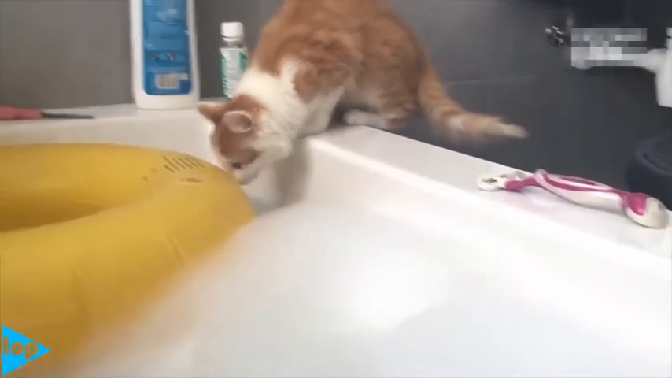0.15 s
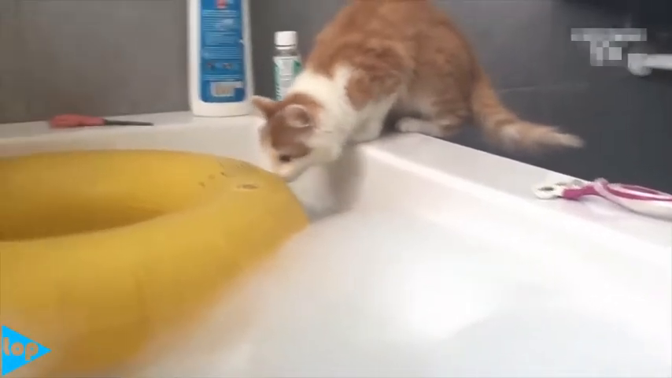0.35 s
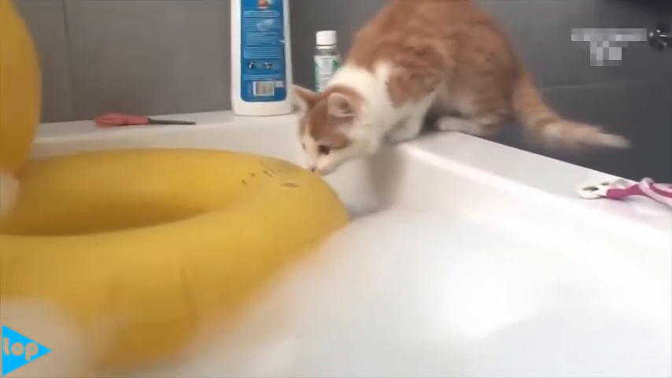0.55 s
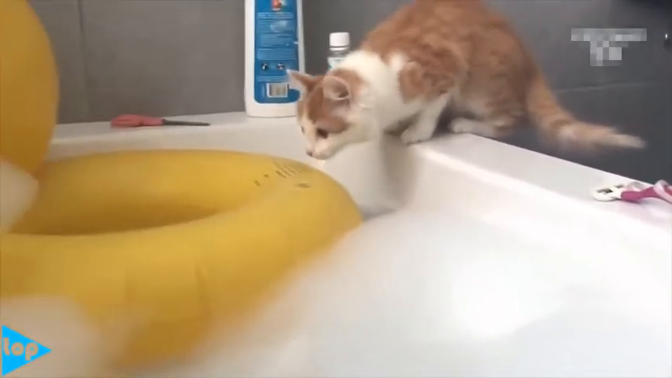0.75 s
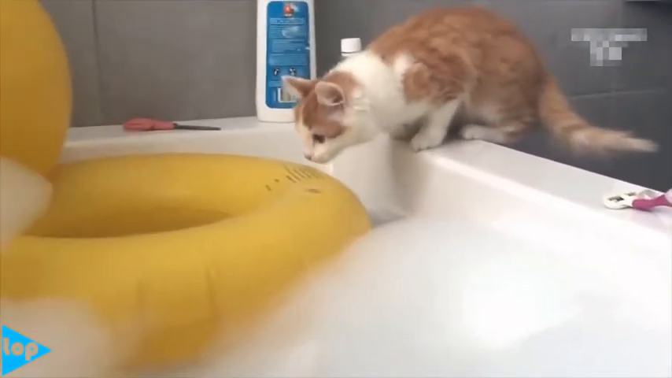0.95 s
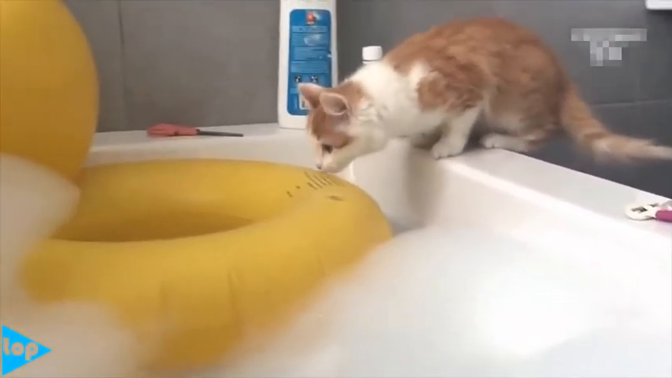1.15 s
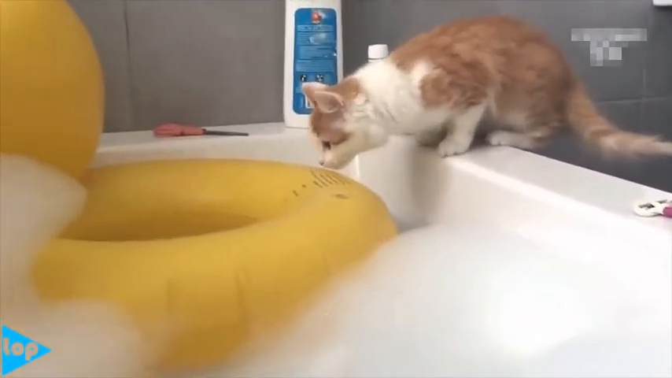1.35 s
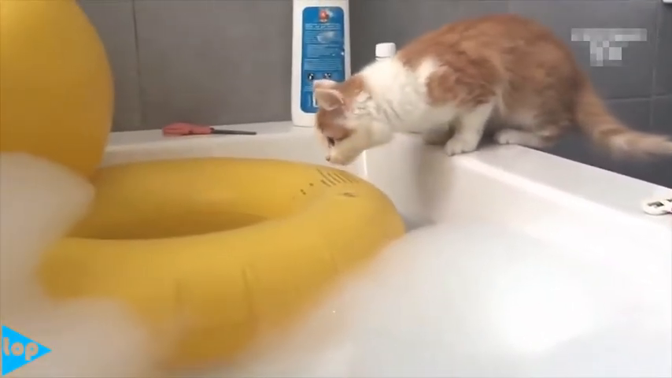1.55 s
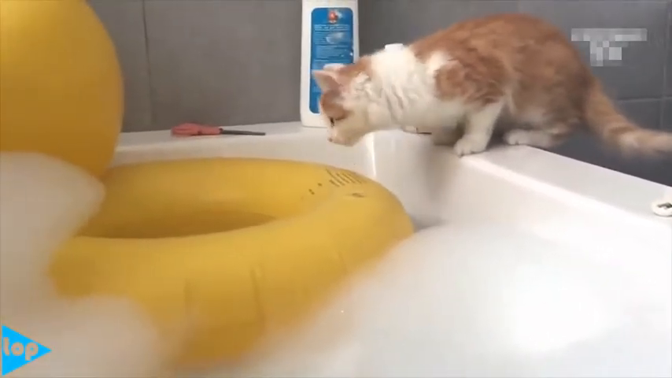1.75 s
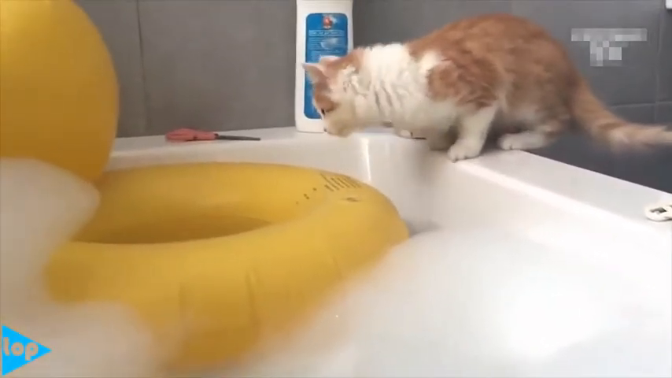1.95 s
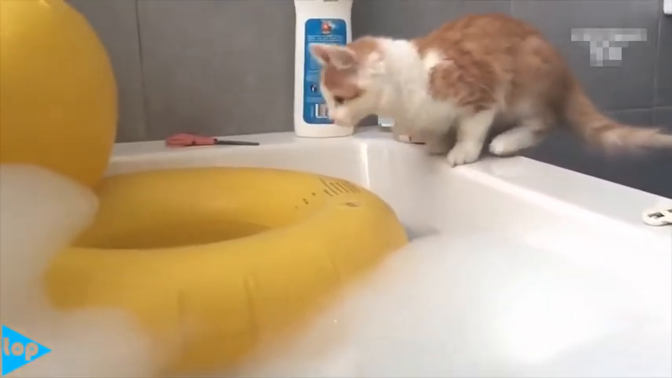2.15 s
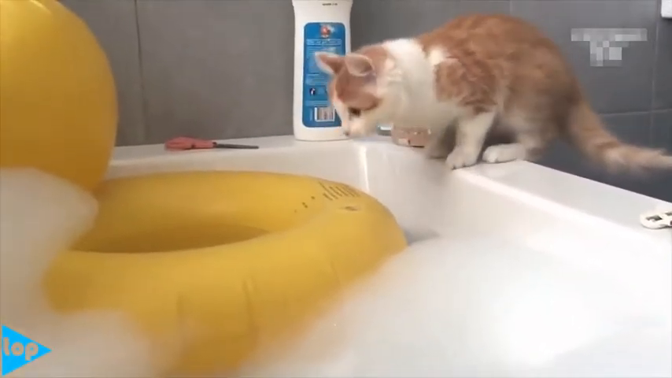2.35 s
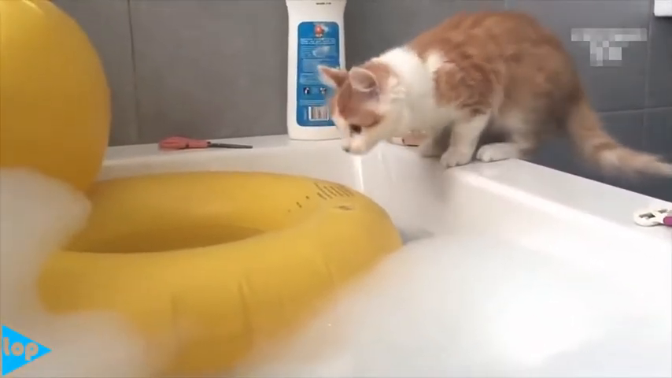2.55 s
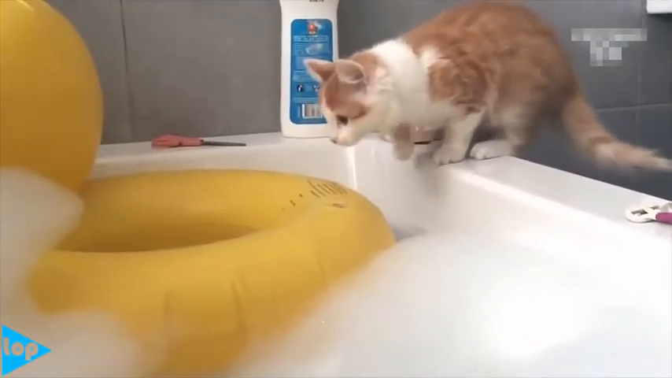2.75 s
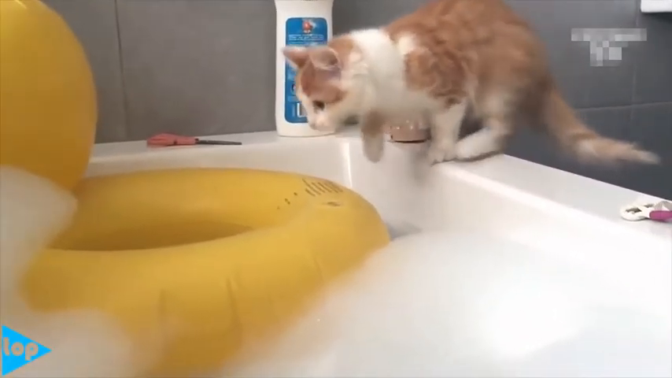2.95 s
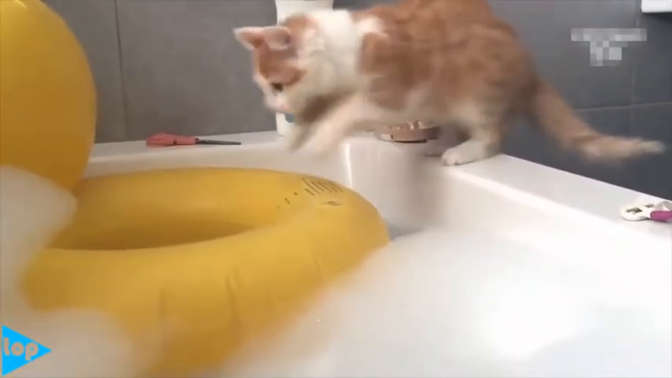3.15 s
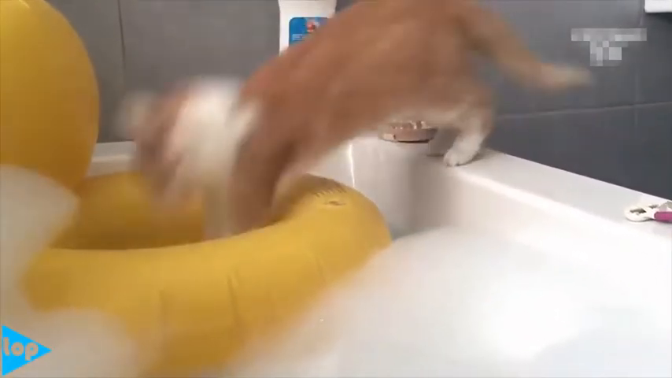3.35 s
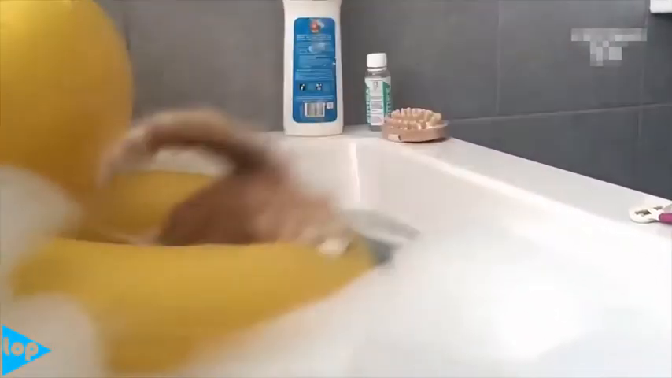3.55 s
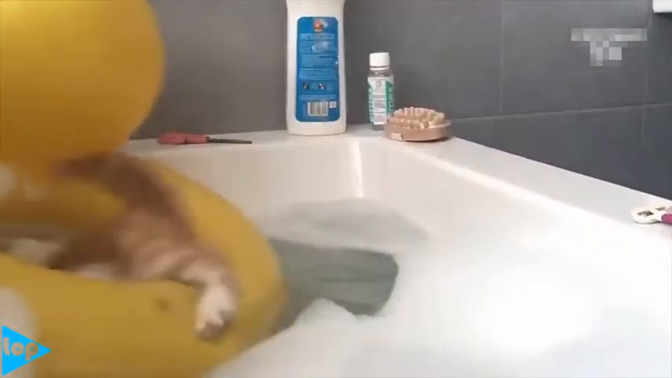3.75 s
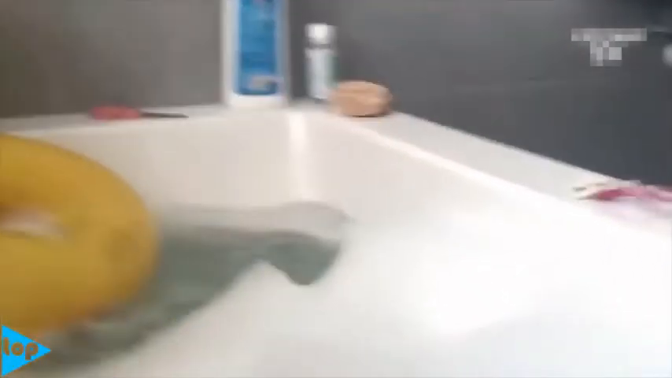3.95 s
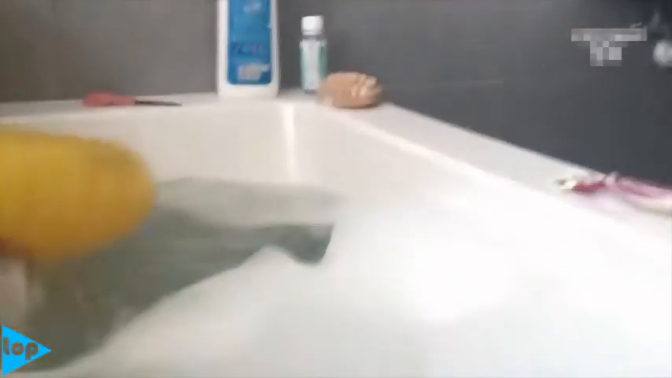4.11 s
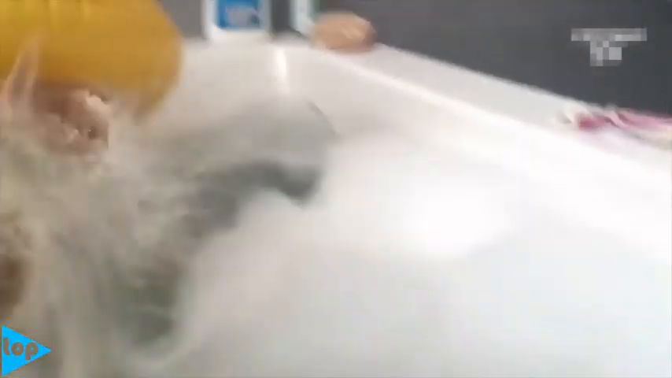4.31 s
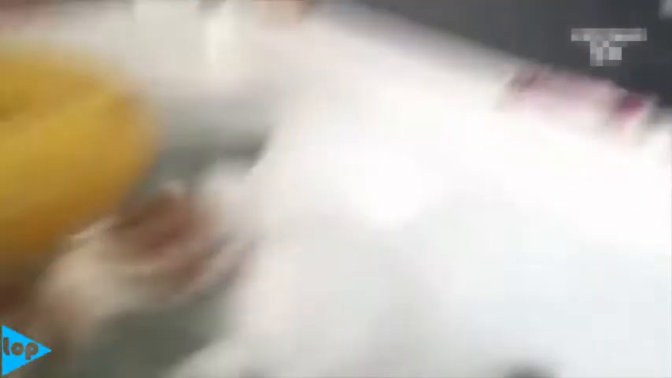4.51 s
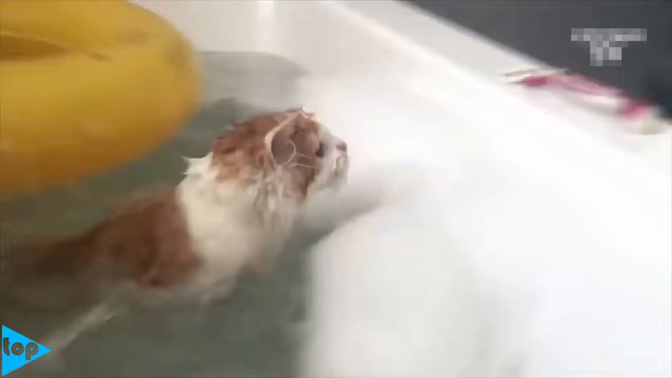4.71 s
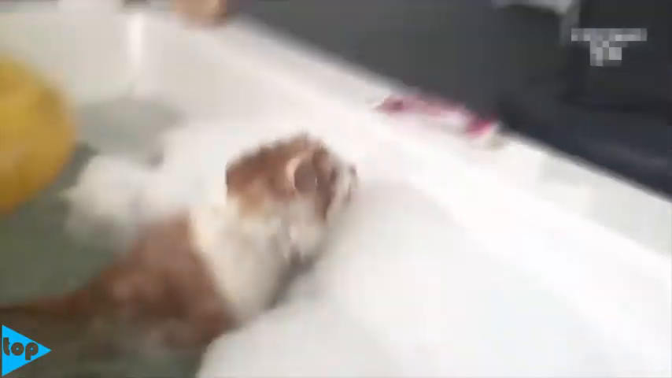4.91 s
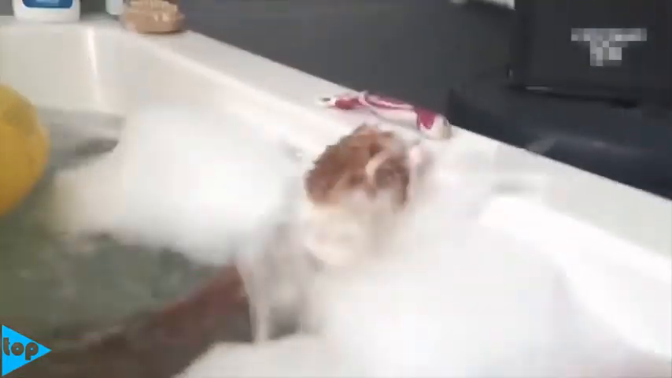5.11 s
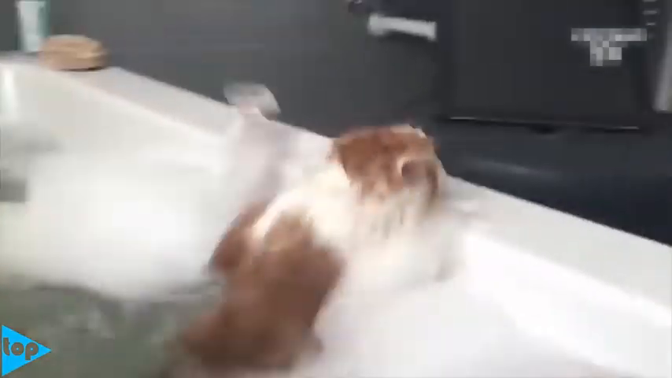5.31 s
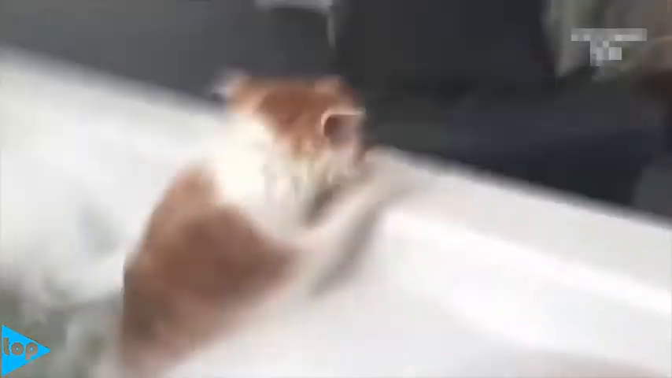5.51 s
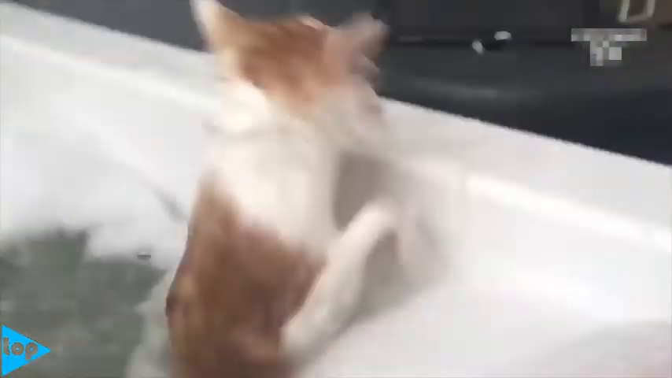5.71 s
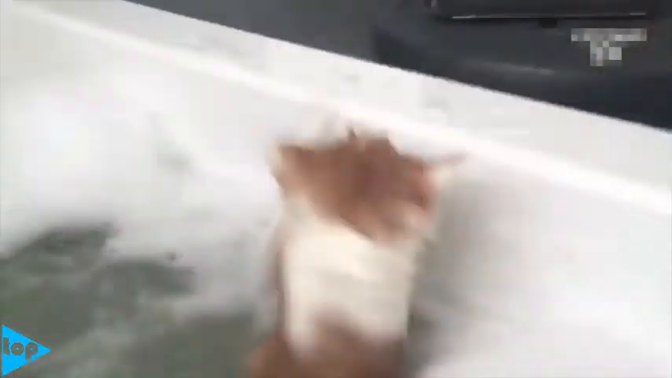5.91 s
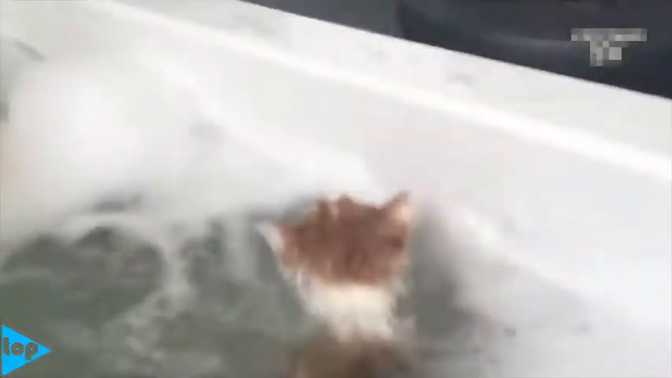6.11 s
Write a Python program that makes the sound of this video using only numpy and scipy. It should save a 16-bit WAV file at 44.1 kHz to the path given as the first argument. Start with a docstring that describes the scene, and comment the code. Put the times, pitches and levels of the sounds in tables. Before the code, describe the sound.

In a small tiled bathroom a fan hums low and steady, with barely audible rustles of a kitten on the tub rim. Suddenly it thumps dully on an inflated ring and plunges with a deep, hollow gulp. Irregular splashes, wet slaps, gurgles and fizzing foam follow as it paddles; a claw clicks on the rim, then small sloshes fade into the hum. Close single microphone, identical in both channels.

```python
"""In a small tiled bathroom a fan hums and faint rustles come from a kitten at the rim of a foamy bath.
At 3.6 s it slips off a swim ring, which thumps dully, and plunges in: trapped air gulps as a damped
resonator, the small room booms in its low modes, and slaps of filtered noise throw spray. Clouds of ringing
bubbles gurgle, patter and fizz as it paddles, drops tick, and at 5.6 s claws click on the rim. At the end
the splashing thins out and the fan remains. One microphone, close by; both channels carry the same sound."""
import sys
import numpy as np
from scipy import signal
from scipy.fft import rfft, irfft, next_fast_len
from scipy.io import wavfile
from scipy.ndimage import uniform_filter1d, map_coordinates

SR = 44100
rng = np.random.default_rng(int(sys.argv[2]) if len(sys.argv) > 2 else 0)


def pcm_store(signal):
    """Save signal as 16-bit PCM."""
    levels = np.round(np.clip(np.atleast_2d(signal), -1, 1) * 32767)
    wavfile.write(sys.argv[1], SR, levels.astype(np.int16).T)


N = 276507  # length in samples

# air pockets closing under the paws: start_s [s], peak_db [dB], pitch_hz [Hz], swell_s [s],
# boom_db [dB, drive of the room's modes]
AIR_POCKETS = [(3.592, -34, 557, 0.0017, -33), (3.652, -21, 233, 0.004, -20),
               (3.6763, -2, 325, 0.0022, -6.5), (3.676, -16, 1630, 0.0022, -38),
               (3.6844, -7, 508, 0.0018, -39), (3.798, -11.5, 220, 0.0038, -13),
               (3.805, -15, 406, 0.00098, -42), (3.864, -15.5, 280, 0.0036, -29),
               (3.878, -22, 310, 0.0015, -36), (4.1711, -10.5, 189, 0.0031, -22),
               (4.180, -27, 458, 0.0026, -38), (4.302, -20, 400, 0.0018, -53),
               (4.4354, -10, 900, 0.0013, -26), (4.503, -19, 710, 0.0021, -17),
               (4.624, -6.5, 755, 0.0034, -8), (4.6365, -8.5, 836, 0.0009, -16.5),
               (4.838, -25.5, 250, 0.009, -23), (4.869, -14, 680, 0.0016, -24.5),
               (4.930, -11, 766, 0.0013, -19.5), (5.089, -3, 480, 0.0013, -8),
               (5.213, -19, 580, 0.0011, -34), (5.242, -23, 444, 0.003, -29), (5.256, -9, 420, 0.0021, -10),
               (5.262, -20.5, 510, 0.0019, -37), (5.3914, -16, 470, 0.002, -24),
               (5.398, -15, 306, 0.0017, -31), (5.419, -15.5, 540, 0.0014, -44),
               (5.553, -20.5, 1010, 0.0022, -46), (5.947, -24, 463, 0.0048, -29)]
# low modes of the bathroom: pitch_hz [Hz], level_db [dB, relative to the drive], t60_s [s]
ROOM_MODES = [(103.3, -5.5, 0.12), (186.2, 2, 0.23), (251, -11.5, 0.13), (274, -14, 0.18),
              (324.3, -10.5, 0.12), (481, -10, 0.063), (545, -21, 0.33), (597, -21, 0.15),
              (722, -24.5, 0.23)]


def gulps(boom_rise_s=0.012):
    """Cavity resonance: each trapped pocket throbs for a few cycles and excites the room's slower modes."""
    pockets, boom = np.zeros(N), np.zeros(N)
    t = np.arange(SR // 2) / SR
    boom_swell = (1 - np.exp(-t / boom_rise_s)) ** 2
    for start_s, peak_db, pitch_hz, swell_s, boom_db in AIR_POCKETS:
        add(pockets, start_s, amp(peak_db) * throb(t, pitch_hz, swell_s))
        # every plunge excites the modes in a different random proportion
        strengths = amp(rng.standard_normal(len(ROOM_MODES)))
        ring = np.zeros(len(t))
        for (mode_hz, level_db, t60_s), strength in zip(ROOM_MODES, strengths):
            ring += strength * amp(level_db) * fade(t, t60_s) * np.sin(2 * np.pi * mode_hz * t)
        add(boom, start_s + 0.00317, amp(boom_db) * ring * boom_swell)
    return pockets, boom


WAKE_DB = -23  # relative to the gulp
WAKE_T60_S, WAKE_RISE_S, WAKE_NARROW = 0.089, 0.0067, 8.6


def wakes():
    """Cavity break-up: each pocket ends in a short noise burst centred on its own pitch."""
    rows = [(start_s, peak_db + WAKE_DB, pitch_hz, WAKE_T60_S) for start_s, peak_db, pitch_hz, *_ in AIR_POCKETS]
    return bursts(rows, patchy(rng.standard_normal(N), depth_db=2.0), WAKE_NARROW, WAKE_RISE_S)


SLAP_RISE_S, SLAP_NARROW = 0.0015, 2.3
SPRAY_HZ, SPRAY_NARROW, SPRAY_RISE_S, SPRAY_T60_S = 4170, 1, 0.0004, 0.26
# slaps on the surface, and at 5.591 s the claw's click on the rim:
# start_s [s], level_db [dB rms], brightest_hz [Hz], t60_s [s], spray_db [dB rms]
SLAPS_AND_CLICK = [(3.626, -44.5, 1960, 0.11, -57), (3.647, -38, 1730, 0.053, -44),
                   (3.658, -37, 2700, 0.039, -60), (3.675, -39, 1220, 0.11, -63),
                   (3.701, -34, 1560, 0.27, -52), (3.7963, -33, 1670, 0.049, -47),
                   (3.805, -26, 1230, 0.26, -46), (4.176, -28.5, 770, 0.21, -41),
                   (4.237, -36, 1400, 0.72, -51), (4.376, -34.5, 2420, 0.52, -54),
                   (4.408, -33, 2400, 0.12, -37), (4.439, -31.5, 1280, 0.3, -28.5),
                   (4.501, -25, 2200, 0.16, -21.5), (4.608, -22.5, 1770, 0.091, -41),
                   (4.623, -17.5, 1710, 0.15, -22.5), (4.868, -24.5, 1430, 0.16, -34),
                   (4.971, -39, 1770, 0.06, -38.5), (5.085, -20.5, 1250, 0.17, -30.5),
                   (5.253, -26.5, 1130, 0.16, -49), (5.276, -32.5, 1210, 0.12, -50),
                   (5.392, -48, 900, 0.052, -57), (5.433, -56, 1700, 0.3, -34),
                   (5.552, -28.5, 2480, 0.022, -40), (5.591, -16.5, 5040, 0.0093, -33.5),
                   (5.952, -33.5, 1580, 0.22, -35.5), (5.969, -33.5, 1290, 0.19, -38.5),
                   (6.005, -41, 1500, 0.15, -58), (6.151, -32, 1050, 0.25, -43),
                   (6.156, -39.5, 2780, 0.18, -61), (6.190, -40, 1500, 0.16, -56)]


def slaps():
    """Impact noise: slaps, and one click on the rim, burst into crackle, ringing bubbles and a fine spray."""
    crackle = rng.standard_normal(N) * amp(1.1 * wobble(300))
    ringing = bubbles(640, 4670, cycles=13.4, glide=0.067, count=5000)
    water = patchy(crackle + amp(-7) * ringing, depth_db=2.5)
    mist = patchy(rng.standard_normal(N) * amp(0.37 * wobble(250)), depth_db=2.5)
    blows = [(start_s, level_db, hz, t60_s) for start_s, level_db, hz, t60_s, _ in SLAPS_AND_CLICK]
    sprays = [(start_s, spray_db, SPRAY_HZ, SPRAY_T60_S) for start_s, *_, spray_db in SLAPS_AND_CLICK]
    blow_sound = bursts(blows, water, SLAP_NARROW, SLAP_RISE_S)
    spray_sound = bursts(sprays, mist, SPRAY_NARROW, SPRAY_RISE_S)
    return blow_sound + spray_sound


# paws striking the water flat: start_s [s], peak_db [dB], brightest_hz [Hz]
FLAT_STRIKES = [(3.6295, -30, 1400), (3.677, -11.5, 1120), (3.6775, -22.5, 2070), (3.685, -14, 1170),
                (3.714, -23.5, 2210), (3.796, -24, 1710), (3.804, -23, 1460), (3.806, -24.5, 3450),
                (4.418, -21, 2200), (4.435, -17, 1640), (4.501, -31, 2620), (4.539, -13.5, 1930),
                (4.626, -5.5, 2900), (5.089, -17, 1190), (5.390, -27, 920), (5.400, -25, 1090),
                (5.418, -28, 950), (5.5285, -23, 2300), (5.093, -17, 3500), (5.953, -39, 2200),
                (5.971, -19, 1940), (6.155, -23, 1100), (6.159, -20, 3030)]


def smacks():
    """Impulsive excitation: a flat paw cracks on the surface as a few milliseconds of band-limited noise."""
    return snaps(FLAT_STRIKES, swell_s=0.0023, narrow=9)


PLIP_SWELL_S = 0.0033  # swell time of a 1 kHz bubble
PLIP_SHORTER = 0.4  # smaller bubbles ring shorter by this power of pitch
# single bubbles that pop up clear of the wash: start_s [s], peak_db [dB], pitch_hz [Hz]
LONE_BUBBLES = [(3.747, -29, 1015), (3.805, -24, 647), (3.869, -25.5, 717), (3.904, -37, 855),
                (4.071, -36, 685), (4.178, -27, 814), (4.243, -29, 666), (4.264, -28, 1370),
                (4.296, -40, 1349), (4.318, -29, 2630), (4.351, -32, 1247), (4.379, -29, 2650),
                (4.461, -21, 1440), (4.538, -23, 1320), (4.540, -24, 2060), (4.590, -23, 4560),
                (4.624, -20, 1263), (4.680, -29, 2500), (4.702, -27, 950), (4.726, -31, 3440),
                (4.755, -27.5, 2210), (4.782, -27, 1140), (4.789, -32, 650), (4.796, -30, 2340),
                (4.846, -29.5, 935), (4.876, -23, 1378), (4.972, -27, 786), (4.986, -26, 2009),
                (5.092, -17.5, 990), (5.156, -28, 1320), (5.262, -24, 1410), (5.474, -29, 1150),
                (5.647, -31.5, 1280), (5.973, -32, 631), (6.012, -35, 1636), (6.157, -37, 2810),
                (6.195, -32, 1263), (6.198, -36, 1850)]


def plips():
    """Bubble resonance: a lone bubble rings at the surface, rising a little in pitch."""
    out, t = np.zeros(N), np.arange(SR // 20) / SR
    for start_s, peak_db, pitch_hz in LONE_BUBBLES:
        swell_s = PLIP_SWELL_S * (1000 / pitch_hz) ** PLIP_SHORTER
        add(out, start_s, amp(peak_db) * throb(t, pitch_hz, swell_s, glide=0.071))
    return out


BURBLE_RISE_S, BURBLE_NARROW = 0.0022, 170
# clusters of like-sized bubbles at the surface: start_s [s], level_db [dB rms], pitch_hz [Hz], t60_s [s]
BUBBLE_CLUSTERS = [(3.712, -35, 1340, 0.12), (3.805, -24, 1320, 0.11), (3.99, -44, 1780, 0.49),
                   (4.01, -46.5, 3380, 0.76), (4.248, -42, 2660, 0.38), (4.385, -32, 2750, 0.17),
                   (4.765, -33, 690, 0.14), (4.870, -24, 1800, 0.13), (4.876, -35, 4050, 0.17),
                   (4.935, -29.5, 850, 0.13), (5.438, -28, 990, 0.16)]


def burbles():
    """Superposition: many bubbles of nearly one size blur into a rough ring, made as narrow-band noise."""
    return bursts(BUBBLE_CLUSTERS, rng.standard_normal(N), BURBLE_NARROW, BURBLE_RISE_S)


GURGLE_DB, PATTER_DB, FIZZ_DB = -1, -3, 1.5  # each layer over its control
PATTER_FOAM_SHARE = 0.38  # droplets follow the foam by this share, the churning by the rest
SURGE_DB, SURGE_PER_S = -2, 51  # the water heaves unevenly: depth, random knots a second
# control for the water and for the foam on it: time_s [s], churning_db [dB], foam_db [dB]
STIR_CONTROL = [(3.55, -76, -74), (3.66, -27.5, -48.5), (3.78, -38, -50.5), (3.84, -37, -51),
                (4.09, -40.5, -42), (4.2, -35, -54), (4.35, -35, -41.5), (4.4, -31.5, -37.5),
                (4.57, -36, -32.5), (4.81, -30.5, -42.5), (4.96, -35.5, -43), (5.06, -41.5, -51.5),
                (5.2, -37.5, -51), (5.31, -39.5, -59), (5.41, -43, -52), (5.49, -35.5, -40.5),
                (5.63, -39.5, -42.5), (5.73, -52.5, -45.5), (5.93, -50, -50.5), (6.15, -51.5, -53),
                (6.27, -55, -51)]
# colour of the large bubbles: frequency_hz [Hz], level_db [dB per Hz, relative]
GURGLE_SPECTRUM = [(120, 7), (250, 7), (400, 0.5), (550, 1), (800, 3), (1100, 1), (1600, 5), (3000, -43)]
# colour of the falling droplets: frequency_hz [Hz], level_db [dB per Hz, relative]
PATTER_SPECTRUM = [(600, -29), (1100, -2), (1500, -2), (2200, 5.5), (2900, 1.5), (4000, 1), (5500, -37),
                   (9000, -50)]
# colour of the foam: frequency_hz [Hz], level_db [dB per Hz, relative]
FIZZ_SPECTRUM = [(2500, -7), (4000, -3.5), (5000, -4), (6400, -1), (8000, -6), (11000, -8.5), (15000, -9.5)]


def slosh():
    """Bubble acoustics, pitch falling with size: large ones gurgle, droplets patter, the foam fizzes."""
    time_s, *levels = np.transpose(STIR_CONTROL)
    t = np.arange(N) / SR
    churn_db, foam_db = [np.interp(t, time_s, level_db, left=-120) for level_db in levels]
    churn_db = churn_db + SURGE_DB * wobble(SURGE_PER_S)
    droplets_db = churn_db + PATTER_FOAM_SHARE * (foam_db - churn_db)

    large = bubbles(307, 1290, cycles=17, glide=0.08, count=1300)
    medium = bubbles(1290, 4630, cycles=31, glide=0.059, count=2000)
    tiny = bubbles(2200, 12000, cycles=3.6, glide=.1, count=3000)
    gurgle = amp(churn_db + GURGLE_DB) * stirred(large, GURGLE_SPECTRUM, wash_db=7.5)
    patter = amp(droplets_db + PATTER_DB) * stirred(medium, PATTER_SPECTRUM, wash_db=11.0)
    fizz = amp(foam_db + FIZZ_DB) * stirred(tiny, FIZZ_SPECTRUM, wash_db=3.5)
    return gurgle + patter + fizz


# the loudest drops and snapping foam cells: start_s [s], peak_db [dB], brightest_hz [Hz]
DROP_TICKS = [(3.718, -27.5, 6000), (3.803, -31, 6920), (4.338, -24.5, 6160), (4.408, -14.5, 9400),
              (4.447, -23, 5530), (4.818, -12, 14800), (5.434, -23, 4730), (5.529, -21, 4260),
              (5.629, -19, 5450), (5.776, -25.5, 3070), (5.805, -24.5, 6150), (5.858, -22.5, 5630),
              (6.126, -25.5, 4730), (6.186, -24, 3700)]


def drops():
    """Transient radiation: single drops and foam cells tick as very short bursts of broad-band noise."""
    return snaps(DROP_TICKS, swell_s=0.0014, narrow=4.1)


# the kitten lands on the inflated ring
THUMP_S, THUMP_DB, THUMP_HZ, THUMP_SWELL_S = 3.675, -12.5, 110, 0.017


def swim_ring():
    """Enclosed-air spring: the air in the ring throbs dully under the kitten's weight."""
    out, t = np.zeros(N), np.arange(SR // 2) / SR
    add(out, THUMP_S, amp(THUMP_DB) * throb(t, THUMP_HZ, THUMP_SWELL_S))
    return out


CLAW_S, CLAW_DB, CLAW_T60_S, CLAW_RISE_S, CLAW_WIDTH_HZ = 5.591, -19, 0.017, 0.00084, 140
# resonances of the hard rim: frequency_hz [Hz], level_db [dB, relative]
RIM_RESONANCES = [(1250, -14), (1700, -5), (3150, -4), (3760, 3), (5100, -4), (6300, 6), (8000, -7),
                  (10500, -10)]


def claw():
    """Forced resonance: a short, hard scratch of noise sets the rim of the tub clicking."""
    out, t = np.zeros(N), np.arange(SR // 20) / SR
    ring = [(hz, amp(level_db)) for hz, level_db in RIM_RESONANCES]
    scratch = unit(filtered(rng.standard_normal(len(t)), lambda hz: peaks(ring, hz, CLAW_WIDTH_HZ)))
    shape = (1 - np.exp(-t / CLAW_RISE_S)) ** 2 * fade(t, CLAW_T60_S)
    add(out, CLAW_S, amp(CLAW_DB) * scratch * shape / shape.max())
    return out


RUSTLE_RISE_S, RUSTLE_NARROW = 0.00084, 9.7
# the kitten creeps along the rim and steps off: start_s [s], level_db [dB rms], brightest_hz [Hz], t60_s [s]
RIM_RUSTLES = [(.060, -61, 13300, .03), (.075, -65, 2500, 0.45), (.085, -74, 3500, .3),
               (1.515, -64, 3600, 0.037), (1.516, -67, 5500, .03), (2.113, -62.5, 8400, 0.16),
               (2.687, -63.5, 8300, .03), (3.51, -62.5, 4970, 0.11), (3.579, -55, 3400, 0.24)]


def rustles():
    """Friction noise: fur and paws brush the rim in faint bursts of filtered noise."""
    return bursts(RIM_RUSTLES, rng.standard_normal(N), RUSTLE_NARROW, RUSTLE_RISE_S)


def tub_walls(x, strength=.2):
    """Comb filtering: hard sides return quick copies whose strengths vary at random; the hollow colour shifts."""
    out = x.copy()
    for delay_s in rng.uniform(.001, .007, 5):
        add(out, delay_s, strength * wobble(14) * x)
    return out / np.sqrt(1 + 5 * strength ** 2)  # offset the power of the five copies


# decay of the tiled room: frequency_hz [Hz], t60_s [s]
TILE_DECAY = [(150, 0.56), (700, 0.22), (2000, 0.5), (5000, 0.33), (13000, 0.81)]
# strength of the room's answer: frequency_hz [Hz], level_db [dB]
ECHO_STRENGTH = [(80, -32), (200, -7), (400, -2.5), (1000, -3.5), (3000, -6), (8000, -11.5), (15000, -17)]


def bathroom(x):
    """Reverberation: tiles answer after 4 ms; the random echo pattern is redrawn every third of a second."""
    out, step = np.zeros(N), SR // 3
    for i in range(0, N, step):
        hz, t, z = signal.stft(rng.standard_normal(SR * 2 // 3), SR, nperseg=256)
        decay = fade(t, along(TILE_DECAY, hz)[:, None])
        tail = signal.istft(z * decay, SR, nperseg=256)[1]
        tail = filtered(tail / np.linalg.norm(tail), lambda f: amp(along(ECHO_STRENGTH, f)))
        add(out, i / SR + .004, signal.fftconvolve(x[i:i + step], tail))
    return out


HUM_WAVER_DB = 3.6
# fan and mains tones: pitch_hz [Hz], level_db [dB rms, before a common 2 dB cut], wander_rad [rad]
HUM_TONES = [(46.5, -50.5, 0.66), (100.1, -38.2, 0.7), (145.2, -49.5, 0.5), (194.5, -47.5, 0.92),
             (245, -56, 1.55), (275, -65, 1.2), (298, -62, 1.2), (339, -67, 1.1), (365, -68.5, 1.2),
             (454, -65.5, 2.2), (553, -66.5, 2.2), (614, -72, 1.7)]


def fan_hum():
    """Tonal radiation: steady pitches whose level and phase waver at random."""
    t = np.arange(N) / SR
    hum = np.zeros(N)
    for pitch_hz, level_db, wander_rad in HUM_TONES:
        level = amp(level_db - 2.0 + HUM_WAVER_DB * wobble(12))
        hum += level * np.sqrt(2) * np.sin(2 * np.pi * pitch_hz * t + wander_rad * wobble(9.2))
    return hum


RUMBLE_SWELL_DB = 1.0
# colour of the fan's rumble: frequency_hz [Hz], level_db [dB per Hz, relative]
RUMBLE_SPECTRUM = [(20, 1.5), (45, -22), (58, -6.5), (76, 4.5), (95, -2.5), (118, -6.5), (165, -11),
                   (188, -2), (222, -13.5), (265, -21), (330, -18), (400, -21.5), (440, -18.5),
                   (510, -25.5), (750, -35), (1600, -62), (5000, -90)]


def fan_rumble():
    """Broad-band flow noise: a dull rumble of uneven level."""
    return amp(-40.5 + RUMBLE_SWELL_DB * wobble(5.23)) * coloured_noise(RUMBLE_SPECTRUM)


HISS_DB, HISS_RISE_DB_PER_S = -61.5, 1.18  # level at the start, before patchiness, and its slow growth
DUCT_WIDTH_HZ = 12
# colour of the rushing air: frequency_hz [Hz], level_db [dB per Hz, relative]
RUSH_SPECTRUM = [(400, 6), (750, 1), (1050, 3), (1750, -2), (2500, -8), (4000, -12.5), (7000, -19.5),
                 (14000, -39.5)]
# narrow resonances of the fan's duct: frequency_hz [Hz], lift_db [dB]
DUCT_RESONANCES = [(905, 8.5), (1070, 8.5), (1400, 6.5), (1540, 5), (1700, 9.5), (1800, 7), (2010, 5),
                   (2350, 7.5), (2680, 2), (3030, 7)]


def duct_rush():
    """Duct resonance: narrow peaks colour the fan's faint rush of air; the background hiss slowly grows louder."""
    t = np.arange(N) / SR
    ducted = unit(filtered(coloured_noise(RUSH_SPECTRUM), lambda hz: amp(peaks(DUCT_RESONANCES, hz, DUCT_WIDTH_HZ))))
    return amp(HISS_DB + HISS_RISE_DB_PER_S * t) * patchy(ducted, depth_db=2.5)


def fan():
    """Superposition of the ventilator's tones, rumble and rush of air."""
    return fan_hum() + fan_rumble() + duct_rush()


MIC_HISS_DB = -73.5


def mic_hiss():
    """White noise: the microphone's own even, steady electronic hiss."""
    return amp(MIC_HISS_DB) * rng.standard_normal(N)


def throb(t, hz, swell_s, glide=0.062):
    """Damped bubble resonance: swells to peak 1 and dies away, its pitch climbing as it nears the surface."""
    age = t / swell_s
    phase = 2 * np.pi * np.cumsum(hz * (1 + glide * np.tanh(age / 2 - 1))) / SR
    return age ** 2 * np.exp(2 - 2 * age) * np.sin(phase)


def bubbles(low_hz, high_hz, cycles, glide, count):
    """Random superposition at rms 1: tiny bubbles of random size and strength ring briefly, rising in pitch."""
    when, size, strength, life = rng.random((count, 4)).T[:, :, None]
    k = np.arange(SR // 80)
    turns = low_hz * (high_hz / low_hz) ** size * k / SR
    age = turns / (cycles * (.5 + life))
    phase = 2 * np.pi * turns * (1 + glide * np.minimum(age, 1) / 2)
    ring = np.sin(phase) * fade(age, 0.65) * (1 - k / len(k))
    ring /= np.sqrt(strength + .03)  # a few bubbles are much stronger than the rest
    positions = (when * N).astype(int) + k
    return unit(np.bincount(positions.ravel(), ring.ravel())[:N])


def stirred(cloud, spectrum, wash_db):
    """Spectral shaping: a bubble cloud on a clumpy wash of droplets, coloured and at rms 1."""
    wash = unit(patchy(rng.standard_normal(N), depth_db=3.2))
    return unit(filtered(cloud + amp(wash_db) * wash, lambda hz: amp(along(spectrum, hz))))


def patchy(x, depth_db):
    """Clumped modulation: random patches of gain, a few hundred Hz wide and some 25 ms long."""
    z = signal.stft(x, nperseg=512)[2]
    field = uniform_filter1d(rng.standard_normal(z.shape), size=3, axis=0)
    field = uniform_filter1d(field, size=5, axis=1)
    return signal.istft(z * amp(depth_db * unit(field)), nperseg=512)[1][:len(x)]


def bursts(rows, texture, narrow, rise_s):
    """Enveloped noise: short swells of a texture from rows of start_s, level_db, brightest_hz, t60_s."""
    out, t = np.zeros(N), np.arange(SR // 3) / SR
    for start_s, level_db, centre_hz, t60_s in rows:
        piece = np.take(texture, round(start_s * SR) + np.arange(len(t)), mode="wrap")
        band = unit(filtered(piece, lambda hz: hump(hz, centre_hz, narrow)))
        shape = (1 - np.exp(-t / rise_s)) ** 2 * fade(t, t60_s)
        add(out, start_s, amp(level_db) * shape / shape.max() * band)
    return out


def snaps(rows, swell_s, narrow):
    """Filtered impulses: wet snaps, milliseconds long, from rows of start_s, peak_db, brightest_hz."""
    out, t = np.zeros(N), np.arange(SR // 30) / SR
    shape = (t / swell_s) ** 2 * np.exp(-2 * t / swell_s)
    for start_s, peak_db, centre_hz in rows:
        tick = filtered(rng.standard_normal(len(t)) * shape, lambda hz: hump(hz, centre_hz, narrow))
        add(out, start_s, amp(peak_db) * tick / np.abs(tick).max())
    return out


def coloured_noise(spectrum):
    """Spectral shaping: white noise given a spectrum and scaled to rms 1."""
    return unit(filtered(rng.standard_normal(N), lambda hz: amp(along(spectrum, hz))))


def peaks(rows, hz, width_hz):
    """Resonance curves: a sum of narrow bells, one for each centre in Hz and height."""
    return sum(height / (1 + ((hz - centre) / width_hz) ** 2) for centre, height in rows)


def hump(hz, centre_hz, narrow):
    """Band-pass response: a broad peak of height 1 with equal skirts on a log axis."""
    return np.cosh(np.log((hz + 1) / centre_hz)) ** -narrow


def filtered(x, response):
    """Linear filtering: multiply the spectrum of x by a response of frequency."""
    m = next_fast_len(len(x) + 8192)  # padded so that the ringing does not wrap round
    return irfft(rfft(x, m) * response(np.fft.rfftfreq(m, 1 / SR)), m)[:len(x)]


def along(points, hz):
    """Logarithmic frequency scale: interpolate (Hz, value) points along it."""
    f, v = np.transpose(points)
    return np.interp(np.log(hz + 1), np.log(f + 1), v)


def fade(t, t60):
    """Exponential decay: 60 dB down after t60."""
    return np.exp(-np.log(1000) * t / t60)


def wobble(rate):
    """Random modulation: a smooth curve with rate knots a second."""
    return map_coordinates(rng.standard_normal(2000), [np.arange(N) * rate / SR], mode="wrap")


def amp(db):
    """Level to amplitude: decibels to gain."""
    return 10 ** (np.asarray(db) / 20)


def unit(x):
    """Power normalisation: scale to rms 1."""
    return x / np.sqrt(np.mean(x ** 2) + 1e-20)


def add(track, s, sound):
    """Superposition: mix a sound into the track at time s."""
    i = round(s * SR)
    track[i:i + len(sound)] += sound[:N - i]


def scene():
    """Superposition: direct sounds, their reverberation, the room's boom and the fan, alike in both channels."""
    pockets, boom = gulps()
    splashing = tub_walls(slaps() + slosh() + wakes(), strength=0.16)
    paddling = pockets + splashing + smacks() + plips() + burbles() + drops()
    near = paddling + swim_ring() + claw() + rustles()
    mono = near + amp(-0.5) * bathroom(near) + boom + fan() + mic_hiss()
    return np.array([mono, mono])


LOW_CUT_HZ, TOP_HZ = 37, 15500  # the bass roll-off, the band limit


def record(dry):
    """Saturation and band limiting: loud peaks are rounded, deep bass fades, nothing passes the limit."""
    rounded = dry / (1 + (dry / .8) ** 6) ** (1 / 6)

    def response(hz):
        """High-pass roll-off with a sharp upper limit."""
        return (hz < TOP_HZ) * hz ** 4 / (hz ** 4 + LOW_CUT_HZ ** 4)

    return np.array([filtered(channel, response) for channel in rounded])


dry = scene()
out = record(dry)
pcm_store(out)
```